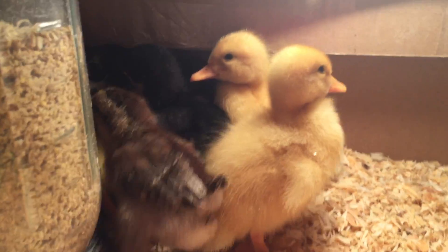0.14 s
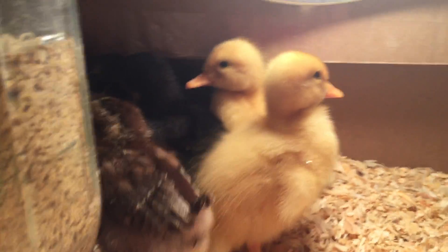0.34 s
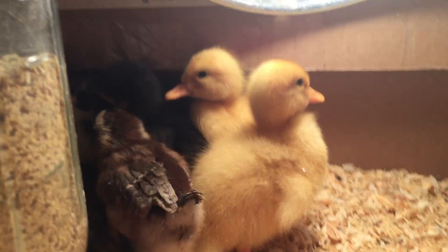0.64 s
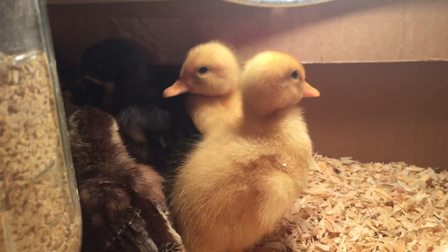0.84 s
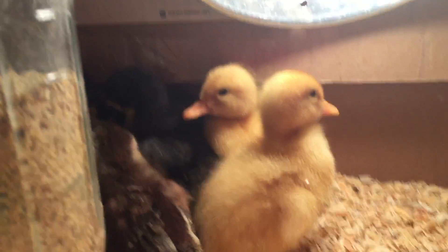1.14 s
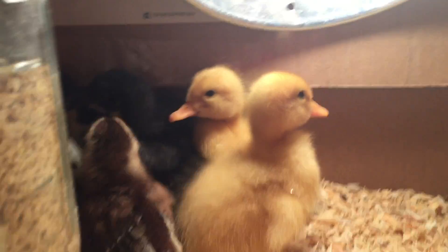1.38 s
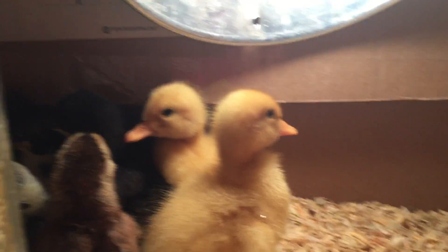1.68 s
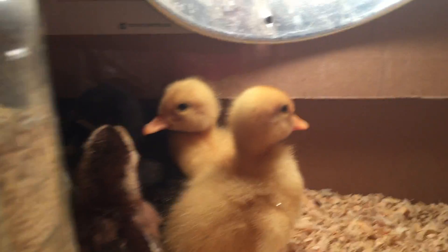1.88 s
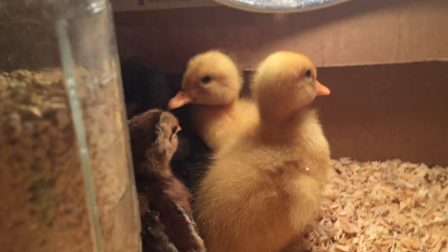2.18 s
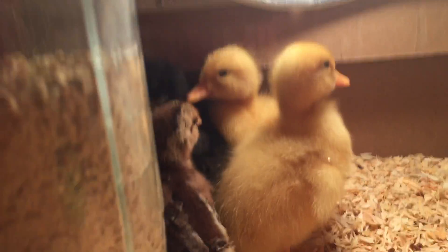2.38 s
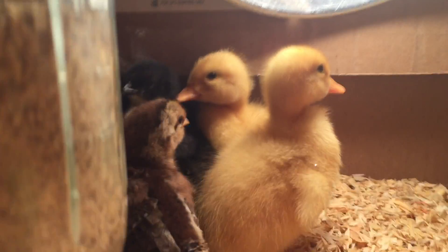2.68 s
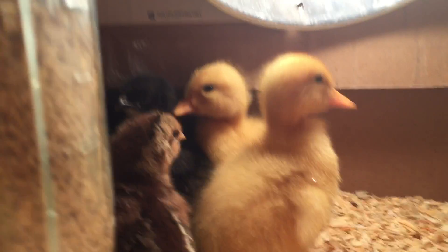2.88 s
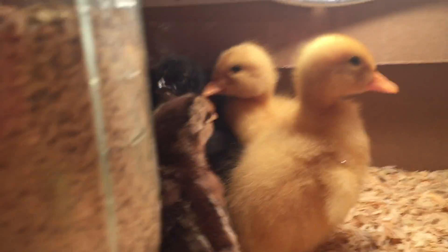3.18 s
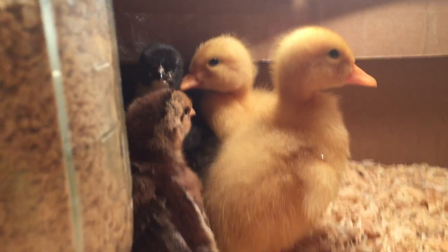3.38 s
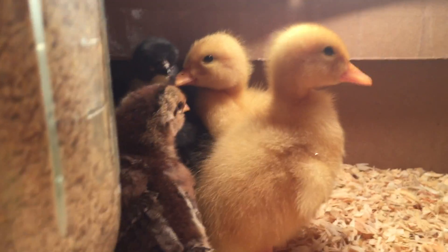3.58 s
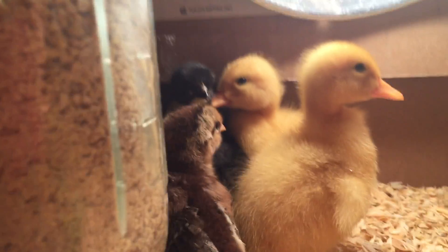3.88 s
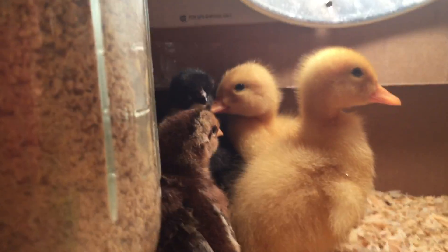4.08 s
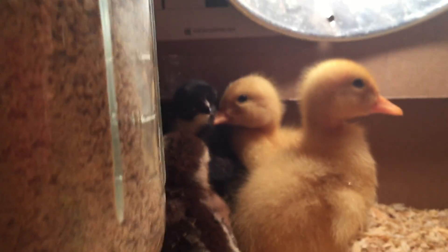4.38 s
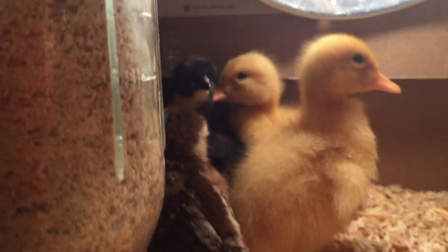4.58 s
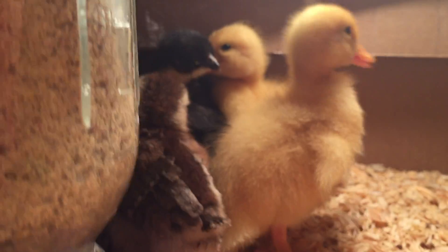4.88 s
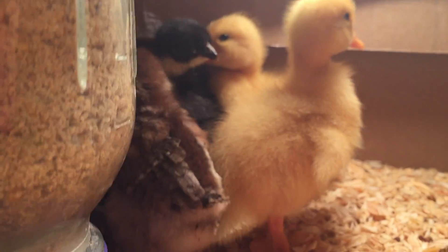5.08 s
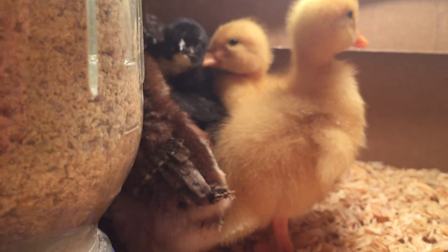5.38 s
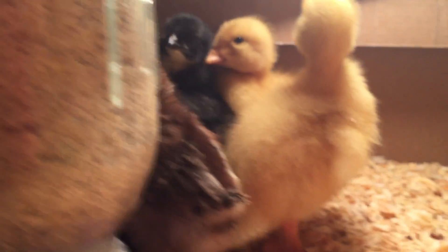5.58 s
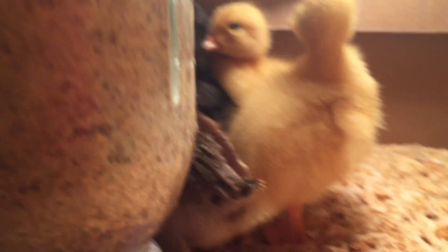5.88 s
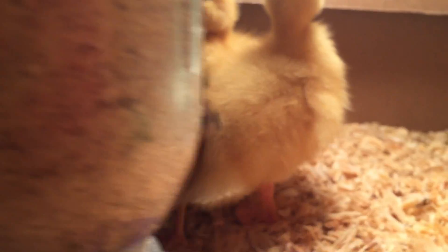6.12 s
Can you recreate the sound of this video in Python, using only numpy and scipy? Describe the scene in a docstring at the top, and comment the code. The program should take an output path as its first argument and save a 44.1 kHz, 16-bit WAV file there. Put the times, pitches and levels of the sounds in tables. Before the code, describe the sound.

Ducklings and chicks peep close by in a cardboard box, with soft bumps, beak taps on plastic and rustling wood shavings.

```python
"""Inside a cardboard box, ducklings and chicks peep close by. Each peep is a sliding whistle that flutters when
soft and steadies when pushed hard; loud calls crack into a rasp. Bodies bump the wall, beaks tap the plastic
feeder and wood shavings snap, all with a short echo off the cardboard. Feet rustle through the shavings over a
lumpy low rumble. A low room rumble and faint hiss lie beneath."""
import sys
import numpy as np
from scipy import signal
from scipy.fft import rfft, irfft
from scipy.io import wavfile
from scipy.ndimage import uniform_filter1d

SR = 44100
rng = np.random.default_rng(int(sys.argv[2]) if len(sys.argv) > 2 else 0)


def materialize(psi):
    """Save the field psi as 16-bit PCM at rate SR to the path in sys.argv[1].

    A 1-D psi becomes a single channel; in a 2-D psi each row is a channel.
    """
    bounded = np.clip(np.atleast_2d(psi).T, -1, 1)
    quanta = np.round(bounded * 32767).astype(np.int16)
    wavfile.write(sys.argv[1], SR, quanta)


N = 275625

# Loud warbles (soft climb, strong middle, quick drop), one list a call: time_s, pitch_hz, level_db
LOUD_CALLS = [
    [(0.073, 3300, -36), (0.079, 3720, -36), (0.088, 2980, -29), (0.096, 2540, -46), (0.1, 2960, -29.5),
     (0.108, 3470, -39), (0.12, 2800, -44)],
    [(4.262, 2100, -58), (4.296, 3270, -44), (4.3024, 3126, -42), (4.3194, 3225, -34.5),
     (4.3438, 2890, -37), (4.3752, 3035, -37), (4.3807, 2870, -36.5), (4.392, 2320, -57),
     (4.402, 2000, -68)],
    [(4.579, 2320, -47), (4.595, 3150, -50), (4.612, 3750, -52), (4.625, 3860, -35), (4.657, 3330, -35.5),
     (4.666, 3225, -26.5), (4.679, 3210, -31), (4.69, 3460, -38.5), (4.707, 3166, -32), (4.7247, 1870, -59)],
    [(4.893, 2200, -52.5), (4.912, 3200, -46), (4.922, 3400, -54), (4.9374, 3970, -65),
     (4.9454, 3764, -33.5), (4.9833, 3240, -32), (5.0172, 3680, -35.5), (5.0252, 3450, -38.5),
     (5.0307, 2500, -41), (5.0377, 2000, -64)],
    [(5.218, 2235, -54), (5.238, 3350, -50.5), (5.2564, 4050, -39), (5.2684, 3695, -32),
     (5.2835, 3665, -29), (5.29, 3432, -20), (5.326, 3481, -24), (5.34, 3690, -38), (5.3497, 3200, -36.5),
     (5.3617, 1990, -59.5)],
    [(5.522, 2340, -42.5), (5.54, 3906, -65), (5.5539, 4110, -36.5), (5.5804, 3732, -28),
     (5.5848, 3514, -16.5), (5.6038, 3394, -19), (5.6213, 3494, -18.5), (5.6342, 3460, -23.5),
     (5.6427, 3740, -31.5), (5.6607, 1970, -52)],
    [(5.881, 3310, -47), (5.9044, 3982, -54), (5.91, 3630, -31), (5.9189, 3597, -24.5), (5.9455, 3370, -29),
     (5.9498, 3408, -18.5), (5.9638, 3432, -19), (5.9858, 3454, -24), (5.9937, 3590, -37),
     (6.0107, 2010, -45.5)],
]
# The voice of each loud call: overtone_db, breath_db
LOUD_CALL_VOICES = [(-17, -20), (-28, -40), (-28, -40), (-22.5, -19), (-27, -20.5), (-24.5, -22),
                    (-26.5, -25)]
# Rasps where a voice cracks: start_s, level_db, length_s
VOICE_CRACKS = [(1.053, -53, 0.039), (1.657, -57, 0.02), (2.05, -53, 0.048), (2.25, -41, 0.023),
                (4.607, -47, 0.024), (4.925, -36, 0.029), (5.01, -52, 0.018), (5.241, -41, 0.033),
                (5.284, -50, 0.0069), (5.329, -46, 0.031), (5.538, -44.5, 0.019), (5.574, -42, 0.0062),
                (5.622, -41.5, 0.039), (5.888, -38.5, 0.031), (5.944, -37, 0.0063), (5.978, -42, 0.032)]
# A bird close by (shares run from 0 to 1): start_s, length_s, first_hz, top_hz, last_hz,
# top_at_share, climb_db, fall_db, fall_shape_share, break_db
CLOSE_PEEPS = [(0.307, .031, 2920, 4060, 2800, 0.39, -39, -42.5, 0.96, 10),
               (1.015, 0.088, 1830, 3505, 1765, .45, -44, -39, 0.43, -4),
               (1.202, 0.082, 1875, 3900, 1837, 0.56, -43, -32, 0.41, -7.5),
               (1.631, .084, 1743, 3547, 1940, 0.48, -44.5, -39.5, 0.74, 6.5),
               (2.024, 0.0848, 1860, 3320, 1890, 0.41, -42, -38, .45, 1.5),
               (2.216, 0.078, 1804, 3950, 2000, 0.43, -37, -30.5, 0.3, -6.5),
               (3.3, 0.096, 2220, 3305, 2010, 0.24, -59.5, -46, 0.56, -1)]
# The voice of each close peep: overtone_db, breath_db
CLOSE_VOICES = [(-33, -21), (-19.5, -14), (-18.5, -7), (-24, -9), (-19.5, -13.5), (-20.5, -9.5), (-26, -15)]
# How well each pitch of the close bird carries: pitch_hz, gain_db
PITCH_CARRY = [(1800, -1), (2050, 1), (2450, -10.5), (2800, 2), (3050, -2), (3400, -3), (3700, -5),
               (4000, -4.5), (4500, 18)]
# Soft, fairly flat peeps: start_s, length_s, first_hz, top_hz, last_hz, top_at_share, early_db, late_db
SOFT_PEEPS = [(0.913, 0.048, 3040, 3010, 2600, .02, -51, -54),
              (1.04, .039, 3260, 3216, 2820, .02, -48, -49),
              (1.797, 0.043, 3460, 3300, 2810, 0.018, -40.5, -34),
              (2.36, 0.058, 2860, 2820, 2480, 0.11, -51, -58),
              (2.497, 0.076, 3080, 2980, 2640, 0.077, -52, -49.5),
              (3.552, 0.072, 2720, 2874, 2650, 0.33, -47.5, -50.5),
              (3.699, 0.076, 3080, 3060, 2720, 0.38, -47.5, -40),
              (4.291, .12, 3310, 3450, 2726, 0.11, -44.5, -51),
              (4.489, 0.1, 3225, 3340, 3055, 0.27, -46, -42),
              (4.493, 0.091, 3545, 3760, 3250, 0.19, -53, -44),
              (5.067, 0.074, 2960, 3070, 2920, 0.23, -52, -48),
              (5.069, .099, 3420, 3400, 2890, 0.11, -47, -47),
              (5.232, 0.11, 3060, 3234, 3000, 0.29, -44.5, -41),
              (5.743, 0.084, 3020, 3200, 2860, 0.31, -42, -42.5),
              (5.911, 0.093, 2977, 3300, 3050, 0.27, -41.5, -34.5),
              (6.126, .115, 3260, 3404, 2940, 0.36, -46, -34),
              (6.13, 0.096, 3760, 3950, 3350, 0.24, -57.5, -45)]
# Thin, high peeps: the same columns as the soft ones, then fall_shape_share
THIN_PEEPS = [(0.231, 0.049, 4500, 5130, 4620, 0.29, -50, -54, 1),
              (0.847, 0.034, 5130, 5800, 5020, 0.24, -48, -46, .5),
              (0.93, 0.05, 5650, 5430, 4260, 0.42, -68, -39, .9),
              (1.041, 0.055, 5140, 5630, 4400, 0.49, -63, -51, 0.65),
              (1.158, 0.053, 3830, 5980, 4140, 0.45, -58, -45, .97),
              (1.225, 0.031, 5500, 5540, 3880, 0.018, -54, -53, .5),
              (1.739, 0.022, 4730, 4640, 4000, .02, -56, -59, .6),
              (1.796, 0.049, 5570, 5400, 3960, 0.204, -52, -50.5, .8),
              (1.935, 0.05, 5684, 5650, 4290, 0.24, -50, -50, 1),
              (2.255, 0.011, 4500, 4450, 4200, .1, -38, -48, 0.54),
              (2.515, 0.045, 5500, 5400, 4250, 0.16, -45.5, -61, 0.97),
              (2.66, 0.055, 5640, 5820, 4240, 0.22, -56, -48.5, 0.69),
              (6.126, 0.024, 5400, 5370, 5050, .3, -58, -52, 0.55),
              (6.209, 0.041, 5400, 6140, 4930, 0.36, -54, -49.5, .5)]
# Bodies against the wall: start_s, peak_db, pitch_hz, rise_s
WALL_BUMPS = [(0., -18, 71.6, 0.0021), (0.053, -35, 108, 0.013), (0.223, -28, 195, 0.0024),
              (0.235, -33, 91.5, 0.0079), (0.286, -28, 114, 0.0021), (0.33, -34, 149, 0.012),
              (0.366, -27, 205, 0.0032), (0.392, -27, 171, 0.0034), (0.414, -35, 99, 0.011),
              (0.436, -29, 90, 0.0042), (0.517, -30.5, 87, 0.023), (0.552, -29.5, 142, 0.017),
              (0.701, -33.5, 192, 0.0054), (0.871, -35.5, 263, 0.0046), (1.2643, -19.5, 194, 0.0037),
              (1.276, -34, 61, 0.0061), (1.317, -29, 185, 0.0045), (1.357, -32, 243, 0.0025),
              (1.362, -27.5, 62, 0.0057), (1.404, -30.5, 179.6, 0.029), (1.549, -39.5, 47.4, 0.02),
              (1.762, -28.5, 160, 0.0042), (1.779, -29, 89, 0.0035), (1.868, -36, 114, 0.024),
              (2.543, -26.5, 144, 0.0036), (2.554, -33.5, 83, 0.012), (2.792, -47, 228, 0.019),
              (3.801, -38, 152, 0.0056), (3.839, -31, 162, 0.0039), (3.962, -38.5, 134, 0.0097),
              (4.131, -43, 103, 0.014), (4.559, -41, 186, 0.0089), (4.748, -36, 132, 0.0064),
              (4.828, -31, 156, 0.0028), (4.845, -34, 180, 0.0043), (4.983, -50, 500, 0.0094),
              (5.107, -40, 81, 0.004), (5.821, -40.5, 140, 0.016), (5.868, -40, 145, 0.027)]
# Beaks on hard plastic: start_s, ring_db, hollow_db
BEAK_TAPS = [(0.231, -40, -55), (0.553, -24, -22.5), (0.846, -27, -45), (0.87, -52, -36),
             (0.919, -24.5, -58), (1.036, -23.5, -65), (1.276, -23.5, -55), (1.356, -30.5, -59),
             (1.482, -34, -57), (1.504, -42, -30), (2.542, -46, -51), (4.023, -66, -71), (4.052, -48, -55),
             (4.083, -52, -51), (4.146, -37.5, -39), (4.161, -44, -46), (4.197, -44, -41.5),
             (4.212, -43, -46), (4.275, -36, -48), (4.291, -37, -42), (4.321, -42, -65), (4.364, -38, -45),
             (4.411, -47, -53), (4.846, -42.5, -54), (6.123, -40.5, -78), (6.158, -35, -69)]
# The feeder's ringing tones (a fade is the time to drop 60 dB): pitch_hz, gain_db, fade_s
FEEDER_TONES = [(1360, -1, 0.0052), (1925, -4, 0.0095), (2630, -10.5, 0.011), (3240, -23, 0.01)]
# Single shavings breaking: start_s, level_db, fade_s
SHAVING_SNAPS = [(0.049, -46, 0.045), (0.1234, -46, 0.087), (0.227, -55, 0.068), (0.258, -45, 0.019),
                 (0.285, -40, 0.024), (0.3336, -45, 0.075), (0.395, -43, 0.023), (0.486, -42.5, 0.029),
                 (0.5853, -31.5, 0.034), (0.682, -37, 0.015), (1.102, -41.5, 0.022), (1.265, -48, 0.024),
                 (1.3546, -44, 0.032), (1.443, -41, 0.027), (1.4815, -53, 0.029), (1.743, -44, 0.022),
                 (1.7708, -42, 0.04), (1.797, -46, 0.029), (1.824, -40.5, 0.035), (1.8424, -42, 0.026),
                 (1.8557, -36, 0.019), (1.8696, -42, 0.021), (1.95, -31.5, 0.018), (1.97, -53, 0.023),
                 (2.611, -55, 0.047), (5.5536, -59, 0.055), (5.703, -47, 0.036)]
# Constant stirring in the box: time_s, rustle_db, crunch_over_rustle_db, rumble_db
STIRRING = [(0, -60, 13, -48.5), (.65, -67, 10, -46), (.75, -71, 16, -53.5), (1.0, -71.5, 9.5, -45.5),
            (1.3, -67.5, 12.5, -45), (1.65, -69, 9, -47.5), (2.0, -70.5, 1.5, -47.5),
            (2.12, -85, 10.5, -54.5), (2.6, -67.5, -1.5, -57.5), (3.0, -74.5, 3, -52.5),
            (3.2, -67, 2, -52.5), (3.53, -78.5, 2, -61), (3.95, -69.5, 0, -48), (4.15, -70.5, -1, -59),
            (4.8, -70, 1, -49), (5.269, -66, -0.5, -54.5), (5.38, -95, 7, -65.5), (5.55, -68, -5, -58.5),
            (6.25, -63, -7, -57)]
# Single sweeps of a foot: start_s, length_s, rustle_db, fizz_db, crunch_db, rumble_db
FOOT_SWEEPS = [(0, 0.024, -35, -68, -43, -41), (0, 0.16, -53.5, -87, -46, -41.5),
               (0.175, 0.2, -80, -93, -73, -42), (0.278, 0.066, -48.5, -86, -39.5, -46),
               (.335, 0.18, -48.5, -91, -42, -41), (.475, 0.054, -41.5, -87, -44, -40),
               (.51, 0.081, -52.5, -85, -44.5, -36), (0.546, 0.11, -37.5, -85, -34, -44),
               (0.644, 0.074, -55, -85, -50, -60), (0.778, 0.055, -45.5, -92, -48, -65),
               (0.831, 0.12, -55, -94, -46.5, -54.5), (1.106, 0.045, -56, -81, -51, -63),
               (1.265, 0.028, -42, -61, -32.5, -20), (1.348, 0.12, -65.5, -62, -69, -44.5),
               (1.481, 0.12, -50.5, -54.5, -50.5, -67), (1.72, 0.14, -64, -66, -54, -50),
               (1.761, 0.12, -56, -84, -48.5, -43.5), (1.95, 0.042, -60, -80, -61, -55),
               (2.177, 0.13, -51, -91, -69, -55), (2.426, 0.2, -62, -81, -68.5, -63),
               (2.528, 0.05, -64, -90, -52, -36), (2.678, 0.27, -64, -73, -75, -88),
               (3.65, 0.33, -65, -94, -74, -61), (3.787, 0.098, -84, -88, -56.5, -43),
               (4.262, 0.097, -64, -80, -86, -87), (4.449, 0.26, -68.5, -76, -62.5, -52.5),
               (4.895, .36, -62.5, -75, -64.5, -71), (5.568, 0.49, -64.5, -75.5, -63, -52.5)]
# Pitches that the cardboard and feeder strengthen: pitch_hz, width_hz, lift_db
BOX_RESONANCES = [(600, 25, 1.5), (939, 73, 1), (1156, 260, 4), (1501, 65, 6), (1833, 69, 5),
                  (2165, 250, 4.5), (2960, 92, 6), (3690, 340, 3), (6560, 300, 2.5), (8880, 1100, 3.5)]
# The tone colour of each noise, from low to high: frequency_hz, gain_db
RUSTLE_COLOUR = [(1060, -29), (1800, -3), (2160, -4), (4370, -10.5), (6130, -8), (7420, -14), (9160, -13),
                 (10400, -16), (16000, -23)]  # dry shavings
CRUNCH_COLOUR = [(210, -30), (350, 4.5), (633, 2.5), (837, -2.5), (1450, -1), (2570, -10), (3000, -15),
                 (3900, -47), (6600, -120)]  # shavings under weight
RUMBLE_COLOUR = [(12, -44.5), (20, -51.5), (40, 4), (81, 11), (114, 3), (182, 2), (325, -7.5), (431, -17),
                 (500, -14.5), (650, -61.5), (1100, -120)]  # a lumpy low rumble
HISS_COLOUR = [(120, -29), (200, -25), (1040, -17), (1230, -5.5), (1350, -11.5), (3070, -6.5), (3490, -10),
               (3900, -14), (16000, -23)]  # faint hiss
ROOM_COLOUR = [(20, -40.5), (40, -4), (65, 2.5), (100, -3), (140, -12), (250, -49.5)]  # steady room rumble
RASP_COLOUR = [(700, -32.5), (1300, -15.5), (2500, -9.5), (3900, 6), (5500, -18), (7500, -16),
               (10000, -59)]
SNAP_COLOUR = [(3000, -30), (6500, -12), (8800, 0), (11000, -10), (16000, -17)]
FIZZ_COLOUR = [(3000, -57), (6000, -25), (9000, 20.5), (12000, 18), (16000, 15)]


def birds():
    """Four kinds of whistle: loud warbles, close peeps, soft peeps and thin high ones."""
    out = np.zeros(N)
    for path, (overtone_db, breath_db) in zip(LOUD_CALLS, LOUD_CALL_VOICES):
        add(out, *peep(path, overtone_db, breath_db, flutter_db=2))
    for row, (overtone_db, breath_db) in zip(CLOSE_PEEPS, CLOSE_VOICES):
        add(out, *peep(breaking_arch(row), overtone_db, breath_db, flutter_db=3))
    for row in SOFT_PEEPS:
        path = arch(*row, fall_shape=0.55, edge_db=-12, turn_rad=0.26)
        add(out, *peep(path, overtone_db=-41.5, breath_db=-21.5, flutter_db=0.9))
    for row in THIN_PEEPS:
        path = arch(*row, edge_db=-1.5, turn_rad=0.098)
        add(out, *peep(path, overtone_db=-44, breath_db=-14, flutter_db=3))
    return out


def peep(path, overtone_db, breath_db, flutter_db):
    """A whistle, steady when pushed hard, fluttery and breathy when soft. Returns start and sound."""
    times, hz, db = np.transpose(path)
    t = np.arange(times[0], times[-1], 1 / SR)
    pitch = uniform_filter1d(np.interp(t, times, hz), 130, mode="nearest")  # muscles round the corners
    level_db = np.interp(t, times, db)
    slack = np.clip((-24.5 - level_db) / 14, 0.1, 1)  # the softer the voice, the slacker
    waver = 0.066 * slack * drift(0.0032, len(t))  # a slack voice box keeps uneven time
    phase = 2 * np.pi * (np.cumsum(pitch) / SR + waver)
    tone = np.sin(phase) * gain_of(slack * flutter_db * drift(0.0027, len(t)))
    dull_db = 5.5 * np.maximum(3660 - pitch, 0) / 1000  # overtones fade as the pitch sinks
    for step in range(3):  # each overtone is 15 dB weaker than the one before
        unsteady_db = 7.6 * slack * drift(0.0038, len(t))
        tone += gain_of(overtone_db - dull_db - 15 * step + unsteady_db) * np.sin((step + 2) * phase)
    breath = slack * gain_of(breath_db) * drift(0.00061, len(t)) * np.cos(phase)
    soft_edges = signal.windows.tukey(len(t), 0.08)
    return times[0], np.sqrt(2) * gain_of(level_db) * (tone + breath) * soft_edges


def arch(start, length, first_hz, top_hz, last_hz, top_at, early_db, late_db, fall_shape,
         edge_db, turn_rad):
    """A peep's path: the pitch bends to top_hz, then slides down; more turn_rad sharpens the turn."""
    attack_s, release_s = 0.0087, 0.024
    progress = np.linspace(0, 1, 48)
    before_top = np.maximum(1 - progress / top_at, 0)
    after_top = np.maximum((progress - top_at) / (1 - top_at), 0)
    end_rad = np.pi * fall_shape  # the fall is part of a cosine; a shape of 1 ends flat
    angle = turn_rad + (end_rad - turn_rad) * after_top
    slide = (np.cos(turn_rad) - np.cos(angle)) / (np.cos(turn_rad) - np.cos(end_rad))
    hz = top_hz - (top_hz - first_hz) * before_top ** 2.2 - (top_hz - last_hz) * slide
    edges = np.maximum(1 - progress * length / attack_s, 1 - (1 - progress) * length / release_s)
    db = early_db + (late_db - early_db) * progress + edge_db * np.maximum(edges, 0)
    return np.transpose([start + progress * length, hz, db])


def breaking_arch(row):
    """An arch whose level steps at the top, where the voice may break for a moment."""
    start, length, first_hz, top_hz, last_hz, top_at, climb_db, fall_db, fall_shape, break_db = row
    times, hz, db = arch(start, length, first_hz, top_hz, last_hz, top_at, 0, 0, fall_shape,
                         edge_db=-2.5, turn_rad=0.51).T
    changeover_s = 0.0076
    past_top = (times - start - top_at * length) / changeover_s
    db = db + climb_db + (fall_db - climb_db) * (1 + np.tanh(past_top)) / 2
    db += break_db * np.exp(-past_top ** 2)
    db += np.interp(hz, *np.transpose(PITCH_CARRY))
    return np.transpose([times, hz, db])


def voice_cracks():
    """A loud voice cracks into a short swell of rasping noise."""
    out, t = np.zeros(N), np.arange(2048) / SR
    for start, db, length in VOICE_CRACKS:
        swell = np.sin(np.pi * np.clip(t / length, 0, 1)) ** 2
        add(out, start, gain_of(db) * noise(RASP_COLOUR, len(t)) * swell)
    return out


def wall_bumps():
    """A soft body leans into the cardboard and lets go, so the wall flexes with a low thud."""
    out, t = np.zeros(N), np.arange(round(0.3 * SR)) / SR
    for start, db, hz, rise_s in WALL_BUMPS:
        push = (t / rise_s * np.exp(1 - t / rise_s)) ** 2.37
        add(out, start, gain_of(db) * push * np.sin(2 * np.pi * hz * t))
    return out


def beak_taps():
    """A beak sets the plastic feeder ringing, along with the hollow of air inside it."""
    out, t = np.zeros(N), np.arange(round(0.3 * SR)) / SR
    hollow_hz = 546
    for start, ring_db, hollow_db in BEAK_TAPS:
        shifts = rng.uniform(0.97, 1.126, len(FEEDER_TONES))  # each blow lands on a new spot
        ring = sum(strike(t, ring_db + db, fade_s, rise_s=0.00026) * np.sin(2 * np.pi * hz * shift * t)
                   for (hz, db, fade_s), shift in zip(FEEDER_TONES, shifts))
        air = strike(t, hollow_db, fade_s=0.023, rise_s=0.002) * np.sin(2 * np.pi * hollow_hz * t)
        add(out, start, ring + air)
    return out


def shaving_snaps():
    """Single shavings break, each with a quick spray of bright noise."""
    out, t = np.zeros(N), np.arange(round(0.3 * SR)) / SR
    for start, db, fade_s in SHAVING_SNAPS:
        add(out, start, noise(SNAP_COLOUR, len(t)) * strike(t, db, fade_s, rise_s=0.0025))
    return out


def feet_in_shavings():
    """Feet stir up a fine rustle, a fizz and a heavier crunch, over a lumpy low rumble."""
    t = np.arange(N) / SR
    fine = mottled(crackle(per_s=3000, spread_db=4.1, clump_db=2.1, friction=0.9), patchy_db=2.6)
    coarse = mottled(crackle(per_s=700, spread_db=3, clump_db=4, friction=1.47), patchy_db=5)
    rustle = coloured(fine, RUSTLE_COLOUR, BOX_RESONANCES)
    fizz = coloured(fine, FIZZ_COLOUR)
    crunch = coloured(coarse, CRUNCH_COLOUR, BOX_RESONANCES)
    rumble = evened(noise(RUMBLE_COLOUR, N) * gain_of(3.65 * drift(0.024, N)))
    times, rustle_db, heavy_db, rumble_db = np.transpose(STIRRING)
    out = rustle * gain_of(np.interp(t, times, rustle_db))
    out += crunch * gain_of(np.interp(t, times, rustle_db + heavy_db))
    out += rumble * gain_of(np.interp(t, times, rumble_db))
    layers = np.array([rustle, fizz, crunch, rumble])
    jerks = gain_of(1.16 * drift(0.0055, N))  # claws catch and slip
    for start, length, *layer_db in FOOT_SWEEPS:
        end = start + length
        rise_s, fall_s = 0.0081 + 0.15 * length, 0.045 + 0.24 * length
        span = slice(round(start * SR), round(end * SR))
        stroke = np.clip(np.minimum((t[span] - start) / rise_s, (end - t[span]) / fall_s), 0, 1)
        out[span] += stroke * jerks[span] * (gain_of(layer_db) @ layers[:, span])
    return out


def crackle(per_s, spread_db, clump_db, friction):
    """Tiny clicks of uneven size swell in clumps, along with a smooth rubbing noise."""
    sizes = gain_of(spread_db * np.minimum(rng.exponential(1, N), 4))
    hits = rng.random(N) < per_s / SR
    clicks = evened(sizes * hits * rng.choice([-1., 1.], N))
    rubbing = friction * rng.standard_normal(N)
    return (clicks + rubbing) * gain_of(clump_db * drift(0.019, N))


def mottled(x, patchy_db):
    """Each flake has its own tone colour, so narrow bands of the sound swell and fade."""
    bands = signal.stft(x, nperseg=512)[2]
    patches = uniform_filter1d(rng.standard_normal(bands.shape), size=3, axis=0)  # blur across pitch
    patches = evened(uniform_filter1d(patches, size=9, axis=1))  # blur across time
    return evened(signal.istft(bands * gain_of(patchy_db * patches), nperseg=512)[1][:N])


def box_echo(x, fade_s, level_db):
    """The cardboard walls throw back a short tail, which is added to the sound."""
    t = np.arange(round(0.2 * SR)) / SR
    tail = rng.standard_normal(len(t)) * gain_of(-60 * t / fade_s) * (t > 0.0015)
    return x + gain_of(level_db) * signal.oaconvolve(x, tail / np.linalg.norm(tail))[:N]


def room_noise():
    """A faint hiss and the steady, deep rumble of the room."""
    return gain_of(-74) * noise(HISS_COLOUR, N) + gain_of(-59.5) * noise(ROOM_COLOUR, N)


def gain_of(db):
    """Turns decibels into a number to multiply by."""
    return 10 ** (np.asarray(db) / 20)


def evened(x):
    """Scales a signal to an average strength (rms) of 1."""
    return x / np.sqrt(np.mean(x ** 2) + 1e-20)


def add(mix, start_s, sound):
    """Mixes a sound in at its start time."""
    part = mix[max(round(start_s * SR), 0):][:len(sound)]
    part += sound[:len(part)]


def strike(t, db, fade_s, rise_s):
    """The loudness of something struck: a quick rise, then a drop of 60 dB every fade_s."""
    return gain_of(db - 60 * t / fade_s) * (1 - np.exp(-t / rise_s))


def coloured(x, colour, resonances=()):
    """Gives x a tone colour, with a bell-shaped lift at each resonance, at strength 1."""
    hz = np.fft.rfftfreq(len(x), 1 / SR)
    points_hz, points_db = np.transpose(colour)
    db = np.interp(np.log(hz + 1), np.log(points_hz + 1), points_db)
    db += sum(lift_db / (1 + (2 * (hz - at_hz) / width_hz) ** 2)
              for at_hz, width_hz, lift_db in resonances)
    return evened(irfft(rfft(x) * gain_of(db), len(x)))


def noise(colour, count):
    """Random noise with the given tone colour."""
    return coloured(rng.standard_normal(count), colour)


def drift(seconds, count):
    """A smooth random wobble of strength 1 that changes over about this time."""
    span = max(round(seconds * SR), 1)
    return evened(uniform_filter1d(uniform_filter1d(rng.standard_normal(count), span), span))


def scene():
    """Birds and knocks echo in the box, over shuffling feet and the room, in one channel."""
    room = room_noise()
    voices = birds() + voice_cracks()
    knocks = wall_bumps() + beak_taps() + shaving_snaps()
    boxed = box_echo(voices + knocks, fade_s=0.14, level_db=-20)
    return (boxed + feet_in_shavings() + room)[None]


def record(dry):
    """Cuts away the very highest treble."""
    cutoff_hz = 15830
    low_pass = signal.firwin(511, cutoff_hz, window=("kaiser", 9), fs=SR)
    return signal.oaconvolve(dry, low_pass[None], "same")


dry = scene()
out = record(dry)
materialize(out)
```